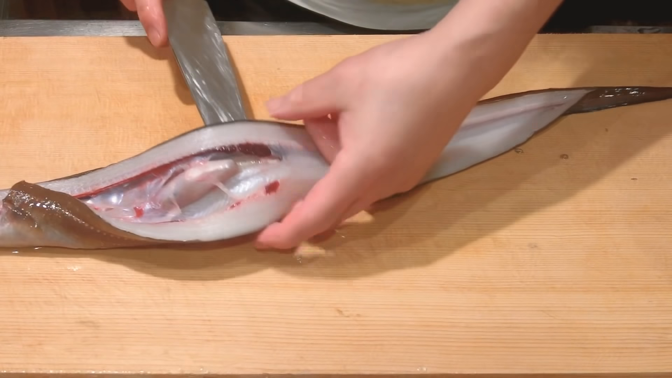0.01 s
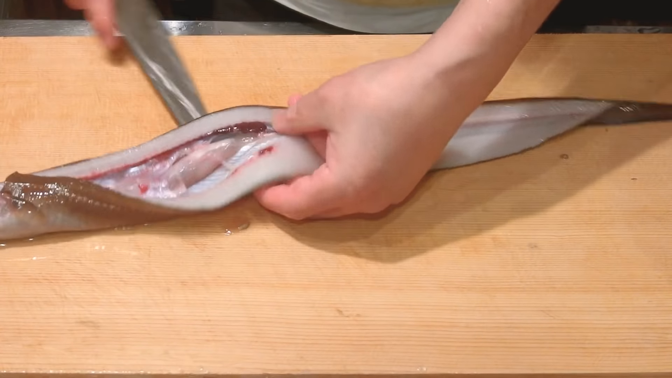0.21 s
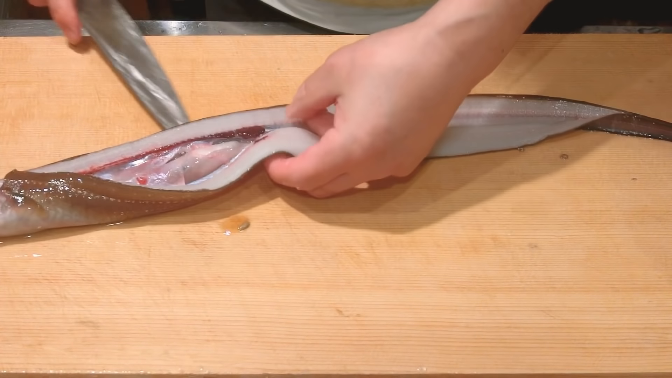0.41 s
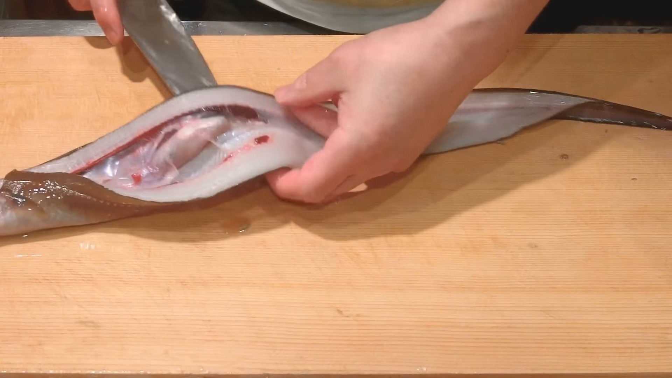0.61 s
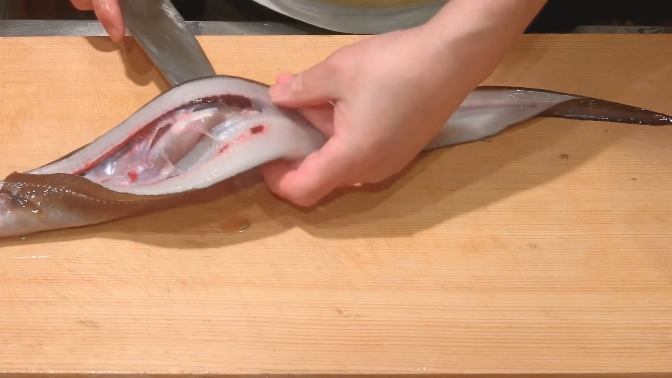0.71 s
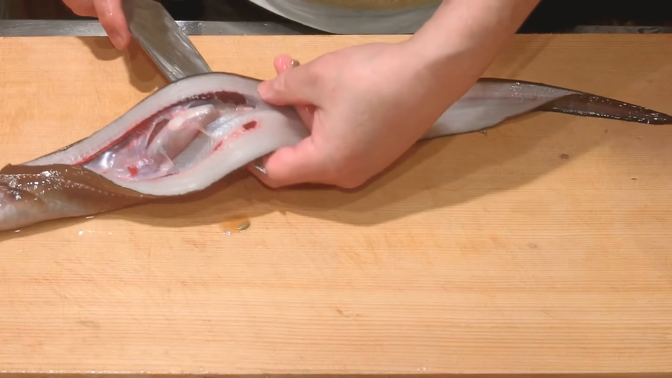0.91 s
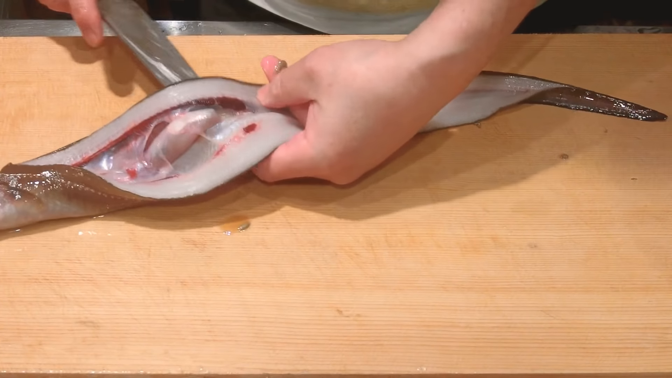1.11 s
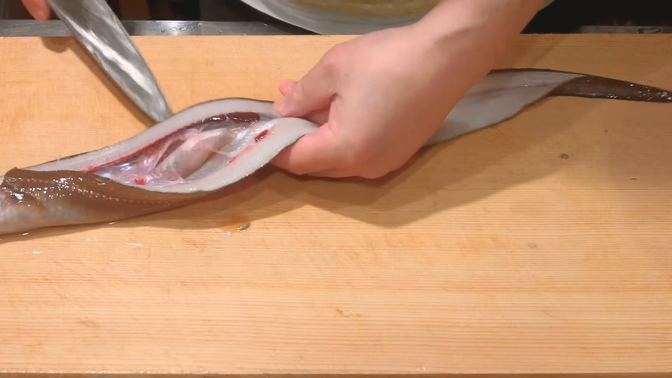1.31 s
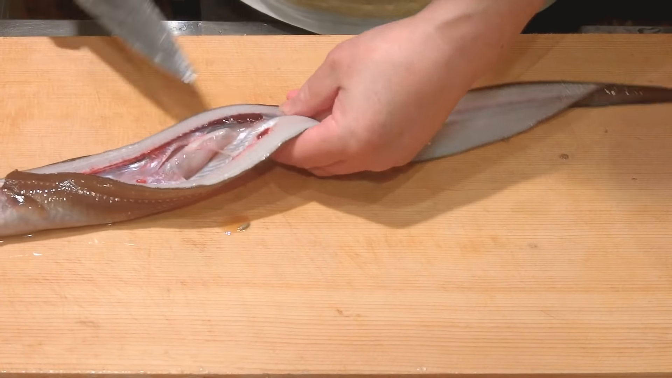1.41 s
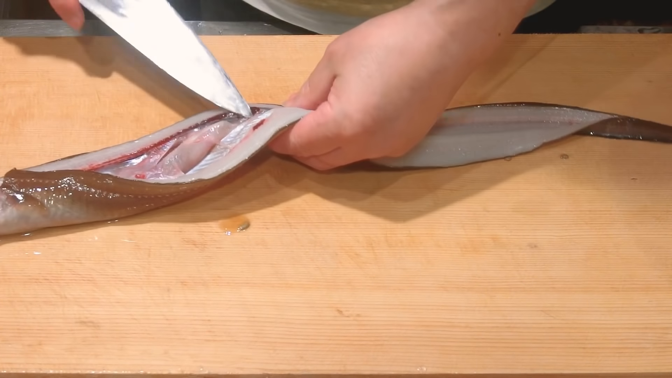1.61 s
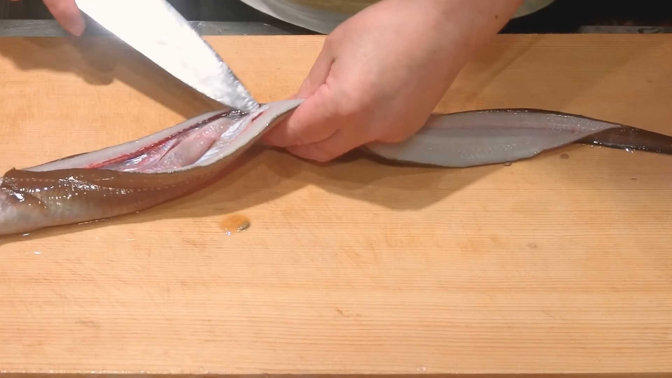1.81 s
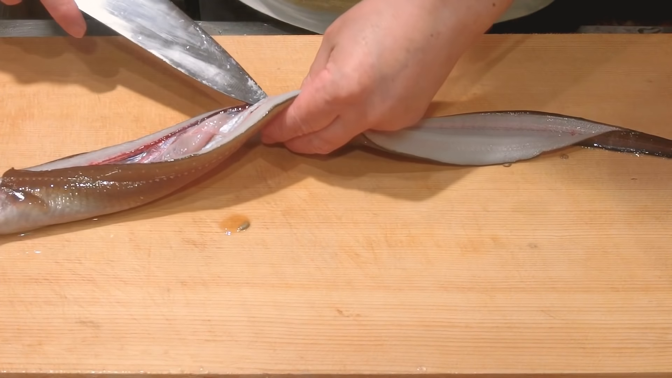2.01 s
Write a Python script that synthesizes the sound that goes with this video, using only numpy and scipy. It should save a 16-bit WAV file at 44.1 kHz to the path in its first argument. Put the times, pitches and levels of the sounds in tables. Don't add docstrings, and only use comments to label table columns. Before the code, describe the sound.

A knife blade knocks once on a wooden cutting board, a bright clack with brief steel ring, followed by faint wet slides and a tiny sharp snap, close up in a small quiet kitchen with soft fan hum.

```python
import sys
import numpy as np
from scipy import signal
from scipy.fft import rfft, irfft
from scipy.io import wavfile
from scipy.ndimage import uniform_filter1d

SR = 44100
rng = np.random.default_rng(int(sys.argv[2]) if len(sys.argv) > 2 else 0)


def makeup_ratio(level_db):
    decades = np.asarray(level_db, float) / 20
    return 10 ** decades


def to_wav(sig):
    pcm = np.clip(np.atleast_2d(sig), -1, 1) * 32767
    pcm = np.round(pcm).astype(np.int16)
    wavfile.write(sys.argv[1], SR, pcm.T)


N = 92610

# start_s, level_db
KNOCK_CONTACTS = [
    (.21322, -12),
    (.2141, -13),
    (.21485, -13),
    (.2198, -21),
]
# freq_hz, level_db
CRACK_COLOUR = [(300, -22.5), (850, -6), (1250, -1), (3650, -5), (3950, -17.5), (8500, -23.5), (14500, -17),
                (16500, -46)]


def evened(x):
    return x / np.sqrt(np.mean(x ** 2) + 1e-20)


def read(points, hz):
    f, value = np.transpose(points)
    return np.interp(np.log(hz + 1), np.log(f + 1), value)


def add(mix, start_s, sound):
    at = round(start_s * SR)
    sound = sound[..., max(-at, 0):]
    part = mix[..., max(at, 0):][..., :sound.shape[-1]]
    part += sound[..., :part.shape[-1]]


def pair(z, same):
    same = np.clip(same, 0, 1)
    mid = np.sqrt((1 + same) / 2) * z[0]
    side = np.sqrt((1 - same) / 2) * z[1]
    return np.array([mid + side, mid - side])


def kitchen_air():
    # freq_hz, density_db_per_hz
    air_tone = [(30, -17.5), (170, -16.5), (250, -13.5), (400, -13.5), (700, -11), (1300, -16),
                (4500, -23.5), (15000, -26.5)]
    # freq_hz, likeness_0_to_1
    air_likeness = [(60, 1), (180, 0.39), (550, 0.58), (1650, 0.64), (4970, 0), (15000, 0.03)]
    level_db, edge_hz, patchy_db = -60, 15600, 1.1
    size = 1024
    frames, hz = N // 256 + 5, np.fft.rfftfreq(size, 1 / SR)
    a, b, c, d, patches = rng.standard_normal((frames, len(hz), 5)).T
    patches = uniform_filter1d(patches, size=10, axis=0)
    patches = evened(uniform_filter1d(patches, size=8, axis=1))
    noise = pair([a + 1j * b, c + 1j * d], read(air_likeness, hz)[:, None])
    gain = makeup_ratio(read(air_tone, hz)[:, None] + patchy_db * patches)
    spectrum = noise * gain * (hz < edge_hz)[:, None]
    hiss = signal.istft(spectrum, nperseg=size, noverlap=768)[1][:, :N]
    return makeup_ratio(level_db) * evened(hiss)


def fan_motor():
    # speed_multiple, level_db
    fan_lines = [(1.66, -70.5), (3.4, -73.5), (3.9, -72), (4.65, -73), (5.15, -71), (6, -67), (6.9, -70),
                 (8, -74.5), (9, -72)]
    speed_hz, width_hz = 103.15, 11.6
    memory = np.exp(-np.pi * width_hz / SR)
    t, out = np.arange(N) / SR, np.zeros((2, N))
    for multiple, db in fan_lines:
        slow_noise = signal.lfilter([1], [1, -memory], rng.standard_normal((2, 2, N)))
        drift = pair(slow_noise, 1.0)
        phase = 2 * np.pi * multiple * speed_hz * t
        line = drift[:, 0] * np.cos(phase) + drift[:, 1] * np.sin(phase)
        out += makeup_ratio(db) * evened(line)
    return out


def far_motor():
    # time_s, speed_hz, level_db
    motor_course = [(0, 55.8, -80), (.4, 55, -69), (.56, 54.5, -70), (.62, 52.74, -71), (.78, 49, -66),
                    (.9, 50.6, -69), (.95, 52.3, -61), (1.1, 54.33, -63.5), (1.17, 54, -66.5),
                    (1.22, 53.5, -61), (1.29, 52.5, -68.5), (1.34, 52.05, -60.5), (1.41, 53, -76),
                    (2.1, 55, -105)]
    # speed_multiple, level_db
    motor_orders = [(2, -8), (3, 0), (4, -9)]
    time_s, speed_hz, level_db = np.transpose(motor_course)
    t = np.arange(N) / SR
    turns = np.cumsum(np.interp(t, time_s, speed_hz)) / SR
    hum = np.zeros(N)
    for multiple, db in motor_orders:
        hum += makeup_ratio(db) * np.sin(2 * np.pi * (multiple * turns + rng.random()))
    return makeup_ratio(np.interp(t, time_s, level_db) + 2) * hum


def wet_strokes():
    # start_s, length_s, level_db, low_hz, high_hz
    slides = [
        (-.25, 0.58, -64.5, 1200, 4460),
        (.47, 0.36, -62.5, 1283, 4800),
        (0.5, 0.067, -63.5, 3000, 14500),
        (1.099, 0.36, -71.5, 1180, 4500),
        (1.402, 0.38, -69, 1520, 4240),
        (1.85, .15, -75, 1500, 5560),
    ]
    grains_per_s, spread_db, likeness = 18000, 2, 0.82
    out = np.zeros((2, N))
    for start_s, length_s, db, low_hz, high_hz in slides:
        chance, sign, size = rng.random((SR // 2, 2, 3)).T
        strength = makeup_ratio(-spread_db * np.log(size + 0.0008))
        grains = (chance < grains_per_s / SR) * np.sign(sign - .5) * strength
        edges_hz = [low_hz, min(high_hz, .45 * SR)]
        band = signal.butter(2, edges_hz, btype="band", fs=SR, output="sos")
        friction = evened(signal.sosfiltfilt(band, pair(grains, likeness)))
        progress = np.minimum(np.arange(SR // 2) / SR / length_s, 1)
        swell = np.sin(np.pi * progress ** 0.78)
        add(out, start_s, makeup_ratio(db) * swell * friction)
    return out


def counter_rumbles():
    # start_s, length_s, level_db, pitch_hz
    pushes = [
        (0.025, 0.14, -74, 63),
        (0.24, 0.11, -70, 64.5),
        (0.37, .2, -72, 71),
        (.72, 0.14, -78, 58),
        (1.278, .2, -86, 58),
    ]
    out = np.zeros(N)
    for start_s, length_s, db, hz in pushes:
        t = np.arange(0, length_s, 1 / SR)
        swell = np.sin(np.pi * t / length_s)
        add(out, start_s, makeup_ratio(db + 5) * swell * np.sin(2 * np.pi * hz * t))
    return out


def wet_ticks():
    # peak_s, level_db, pitch_hz, length_cycles
    bursts = [
        (.12451, -51, 651, 2.6),
        (.5231, -57, 3301, 5.1),
        (1.20591, -45, 14001, 3.1),
        (1.20611, -51, 7501, 2.6),
        (1.20625, -36.5, 11201, 7.5),
        (1.20641, -53, 2901, 3.1),
        (1.4721, -60, 3901, 12.1),
        (1.5271, -59, 3001, 3.1),
        (1.6321, -53, 501, 1.6),
        (1.9441, -53, 701, 1.6),
    ]
    out = np.zeros(N)
    for peak_s, db, hz, cycles in bursts:
        length_s = cycles / hz
        u = np.arange(0, 2.5 * cycles / hz, 1 / SR) / length_s
        envelope = u / 0.2 * np.exp(1 - u / 0.25)
        add(out, peak_s - 0.38 * length_s, makeup_ratio(db) * envelope * np.sin(2 * np.pi * cycles * u))
    return out


def board_clack():
    # pitch_hz, level_db, t60_s
    board_modes = [(373, -23, .13), (540.5, -12, 0.1), (795, -9, 0.035), (1120, 4, 0.0073),
                   (1238, -16.5, 0.042), (1354, -19.5, 0.17), (1840, -18.5, 0.072), (2073, 4, 0.032),
                   (2394, -9, 0.009), (2700, -13.5, 0.094), (2900, -8.5, .03), (3123, -8.5, 0.095),
                   (3386, -1.5, 0.042)]
    contact_s, radiate_hz = 0.0001, 595
    t, out = np.arange(SR // 2) / SR, np.zeros(N)
    ring = sum(-makeup_ratio(db - 60 * t / t60) * np.sin(2 * np.pi * hz * t) for hz, db, t60 in board_modes)
    push = t * np.exp(-t / (contact_s / 2))
    ring = signal.fftconvolve(ring, push / push.sum())[:len(t)]
    ring = signal.sosfilt(signal.butter(2, radiate_hz, "high", fs=SR, output="sos"), ring)
    for start_s, db in KNOCK_CONTACTS:
        add(out, start_s, makeup_ratio(db) * ring)
    return out


def blade_ring(t):
    # pitch_hz, level_db, t60_s
    blade_modes = [(4310, 1.5, 0.032), (4746, 3.6, 0.02), (5500, -14, 0.023), (5970, -4.5, 0.022),
                   (6301, -26, 0.045), (7190, -12, 0.029), (8800, -20, 0.017), (9440, -21, .06),
                   (11240, -14, 0.05), (11700, -29, .045), (12800, -18, .031), (13500, -27, 0.021),
                   (14530, -4, .042)]
    spacing_s, pan_db = .00001, 1
    lag = np.maximum(t - np.array([[0], [spacing_s]]), 0)
    ring = sum(-makeup_ratio(db - 60 * lag / t60) * np.sin(2 * np.pi * hz * lag) for hz, db, t60 in blade_modes)
    hit_db = KNOCK_CONTACTS[0][1]
    return makeup_ratio(hit_db - 7 + pan_db * np.array([[1], [-1]])) * ring


def splinter_crack(t):
    level_db, t60_s, treble_likeness = -10.5, 0.013, 0.68
    hz = np.fft.rfftfreq(len(t), 1 / SR)
    likeness = treble_likeness + (1 - treble_likeness) / (1 + (hz / 3500) ** 2)
    spectrum = pair(rfft(rng.standard_normal((2, len(t)))), likeness)
    noise = irfft(spectrum * makeup_ratio(read(CRACK_COLOUR, hz)), len(t))
    return makeup_ratio(level_db - 60 * t / t60_s) * evened(noise)


def knock():
    rise_s = 0.00063
    t, out = np.arange(SR // 2) / SR, np.zeros((2, N))
    rise = 1 - np.exp(-t / rise_s)
    add(out, KNOCK_CONTACTS[0][0], rise * (blade_ring(t) + splinter_crack(t)))
    return out + board_clack()


def counter_thud():
    pitch_hz, level_db, t60_s, rise_s = 138.2, -42, 0.26, .008
    t, out = np.arange(SR // 2) / SR, np.zeros(N)
    envelope = makeup_ratio(level_db - 60 * t / t60_s) * (1 - np.exp(-t / rise_s))
    add(out, KNOCK_CONTACTS[0][0], envelope * np.sin(2 * np.pi * pitch_hz * t))
    return out


def scattered_knock():
    level_db = 4.5
    hz, out = np.fft.rfftfreq(512, 1 / SR), np.zeros(N)
    clap = np.fft.fftshift(irfft(makeup_ratio(read(CRACK_COLOUR, hz))))
    add(out, KNOCK_CONTACTS[0][0] - 200 / SR, makeup_ratio(level_db) * clap / np.linalg.norm(clap))
    return out


def room(x):
    # freq_hz, t60_s
    room_decay = [(100, 0.28), (260, 0.29), (700, 0.22), (1840, 0.29), (4850, 0.24), (12800, 0.27)]
    # freq_hz, likeness_0_to_1
    room_likeness = [(200, 1), (1300, 0.94), (2400, 0.87), (4400, 0), (8000, 0.33)]
    # freq_hz, level_db
    room_colour = [(100, -10), (600, 11.5), (1300, -7.8), (3000, -0.9), (8000, 3.2), (15000, -2.5)]
    delay_s = .0021
    taps = np.zeros((2, SR // 2))
    at = np.arange(0, SR // 2 - 12, 12) + rng.integers(0, 12, (2, (SR // 2 - 1) // 12))
    np.put_along_axis(taps, at, rng.choice([-1., 1.], at.shape), 1)
    hz, t, z = signal.stft(taps, SR, nperseg=256)
    decay_db = -60 * t / read(room_decay, hz)[:, None]
    z = pair(z, read(room_likeness, hz)[:, None])
    z = z * makeup_ratio(read(room_colour, hz)[:, None] + decay_db)
    tail = signal.istft(z, SR, nperseg=256)[1]
    tail = tail / np.linalg.norm(tail[0])
    tail = np.pad(tail, ((0, 0), (round(delay_s * SR), 0)))
    return signal.fftconvolve(x[None], tail, axes=1)[:, :N]


def scene():
    room_db, tick_room_db = -6, -5.5
    hit, small = knock(), wet_ticks()
    into_room = makeup_ratio(room_db) * hit.mean(0) + scattered_knock() + makeup_ratio(tick_room_db) * small
    action = hit + counter_thud() + small + room(into_room) + wet_strokes()
    background = kitchen_air() + fan_motor() + far_motor() + counter_rumbles()
    return action + background


def roll_off(x):
    return signal.sosfilt(signal.butter(12, 16000, fs=SR, output="sos"), x)


def record(dry):
    return roll_off(dry)


dry = scene()
out = record(dry)
to_wav(out)
```